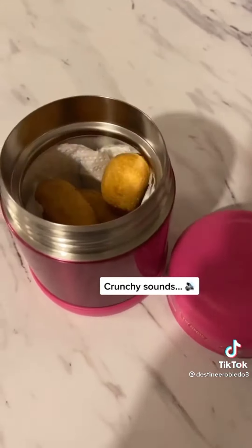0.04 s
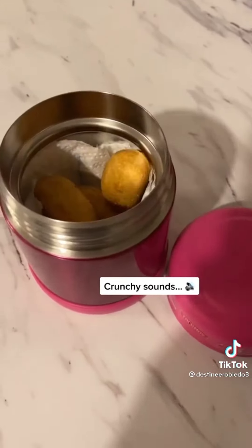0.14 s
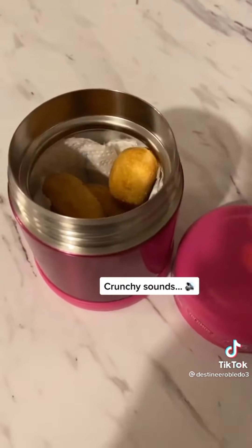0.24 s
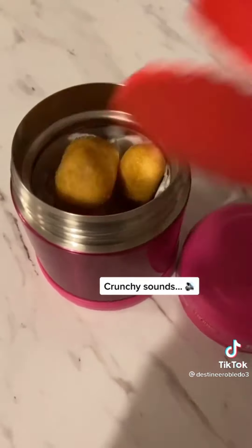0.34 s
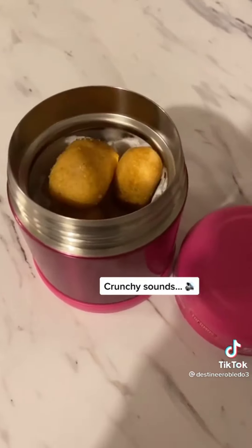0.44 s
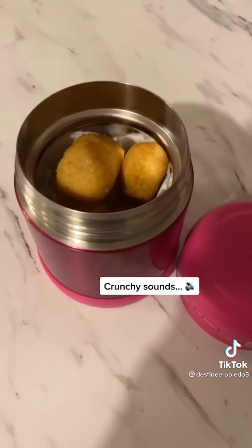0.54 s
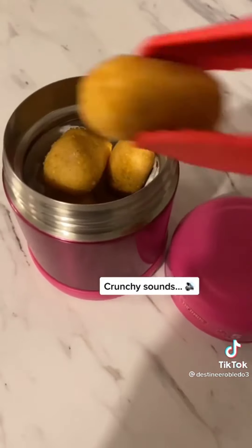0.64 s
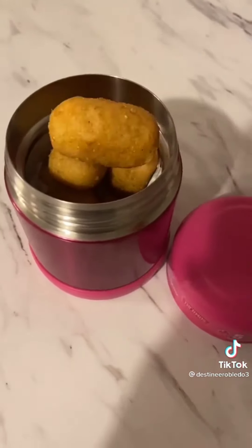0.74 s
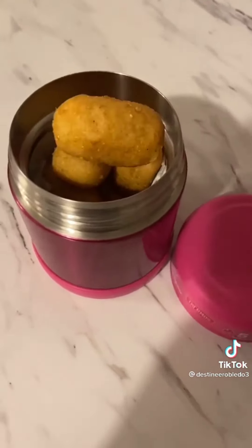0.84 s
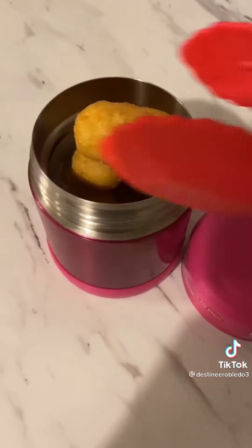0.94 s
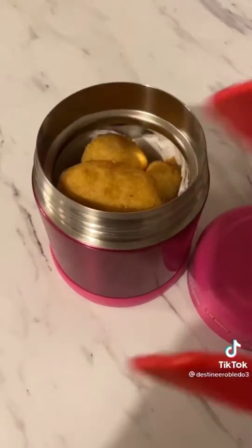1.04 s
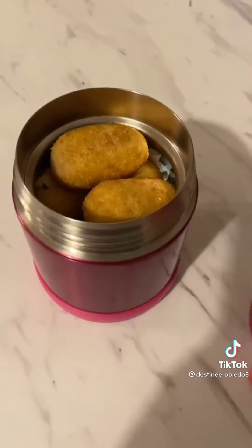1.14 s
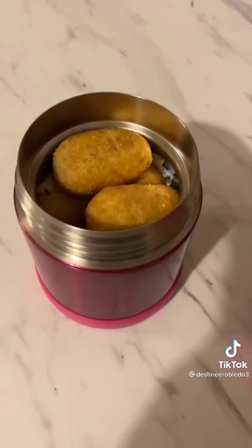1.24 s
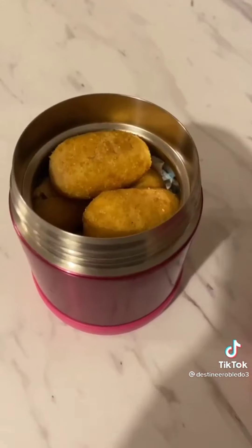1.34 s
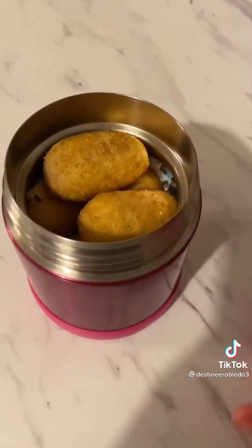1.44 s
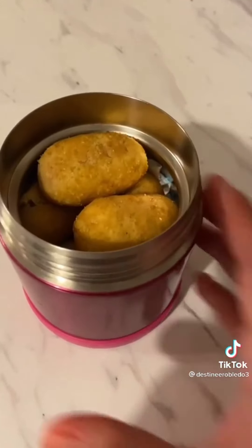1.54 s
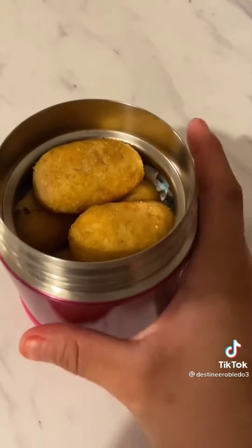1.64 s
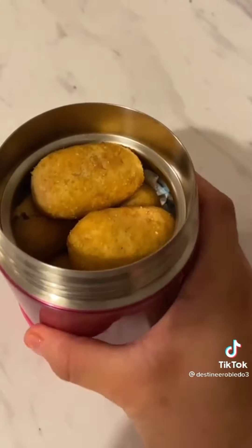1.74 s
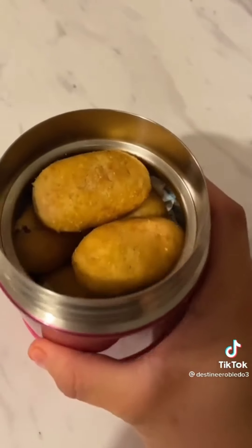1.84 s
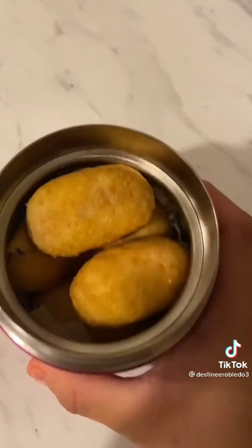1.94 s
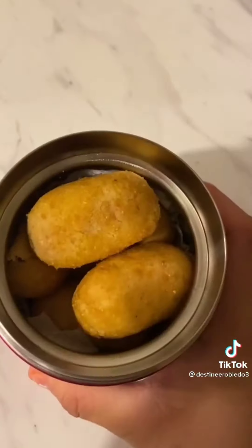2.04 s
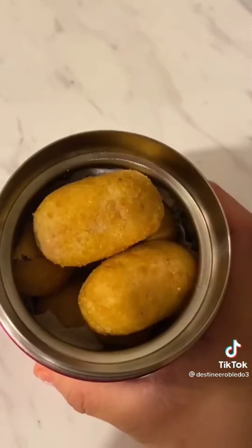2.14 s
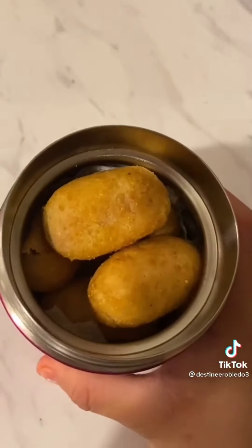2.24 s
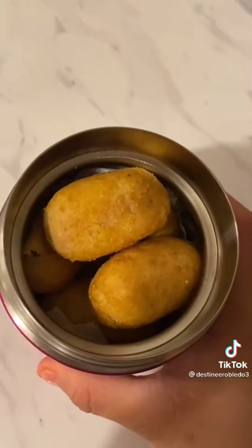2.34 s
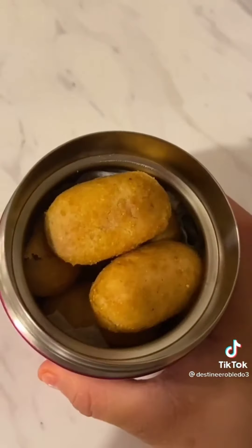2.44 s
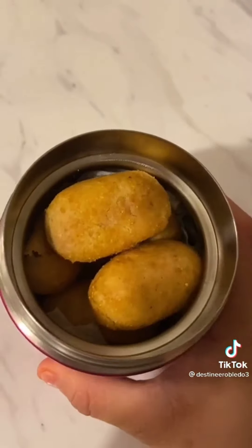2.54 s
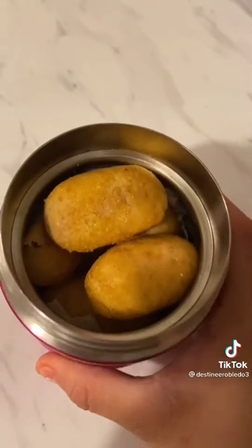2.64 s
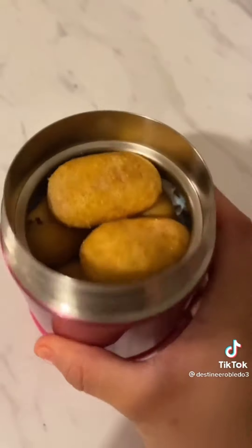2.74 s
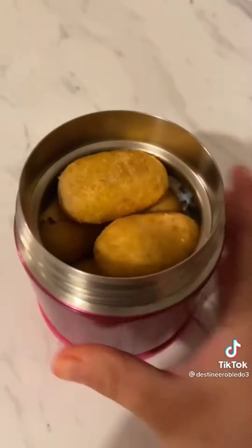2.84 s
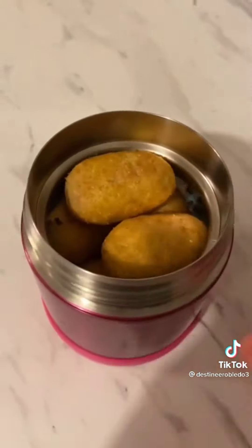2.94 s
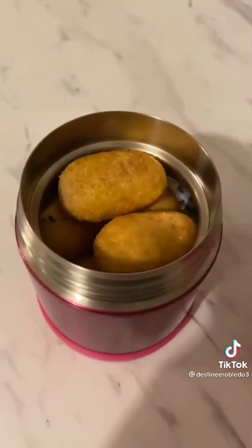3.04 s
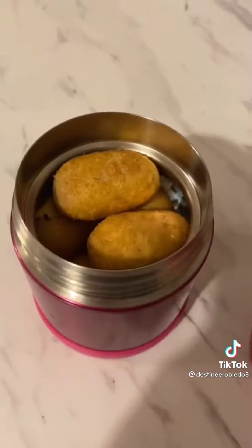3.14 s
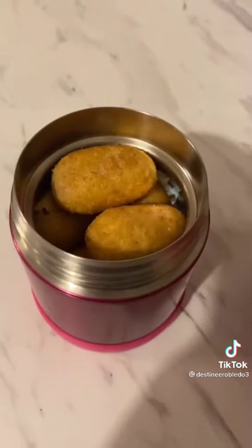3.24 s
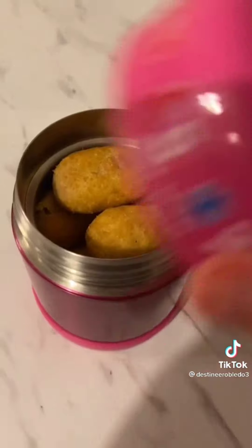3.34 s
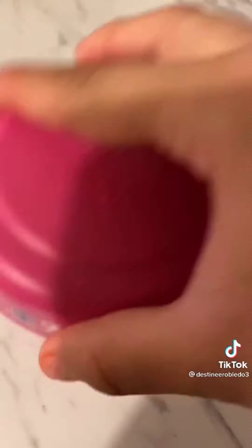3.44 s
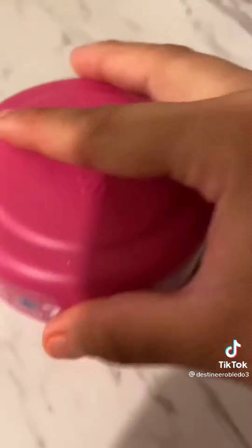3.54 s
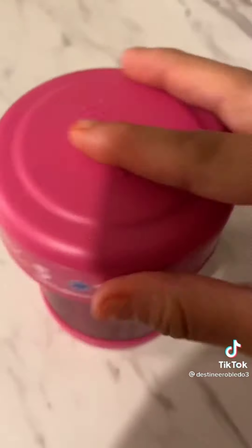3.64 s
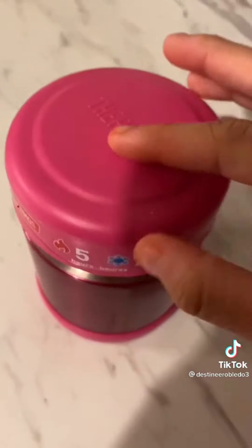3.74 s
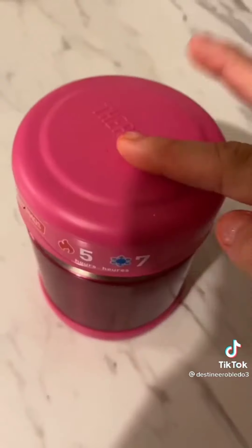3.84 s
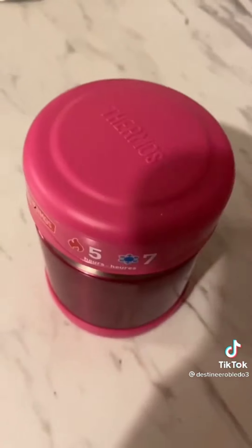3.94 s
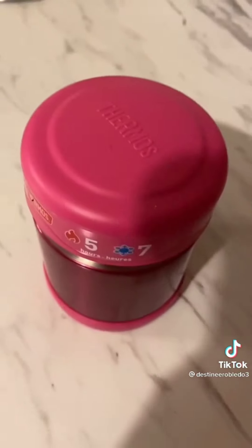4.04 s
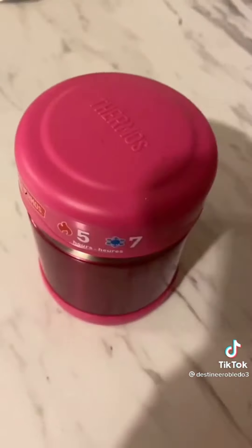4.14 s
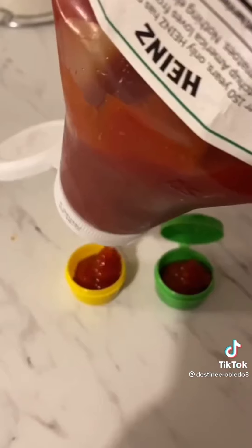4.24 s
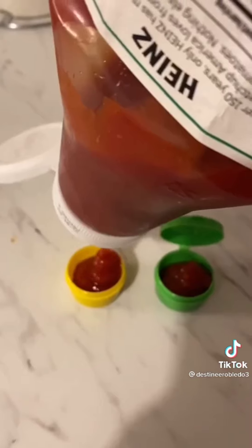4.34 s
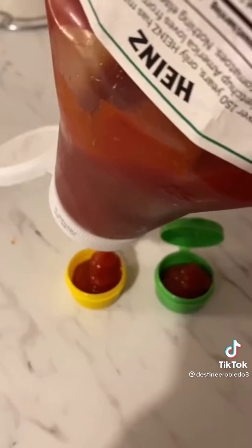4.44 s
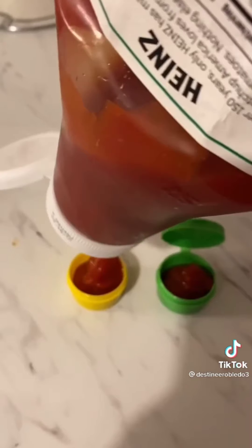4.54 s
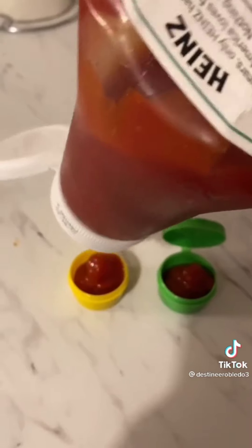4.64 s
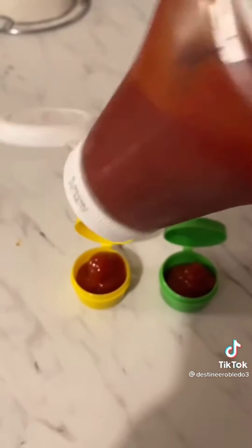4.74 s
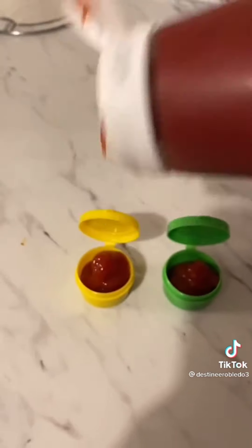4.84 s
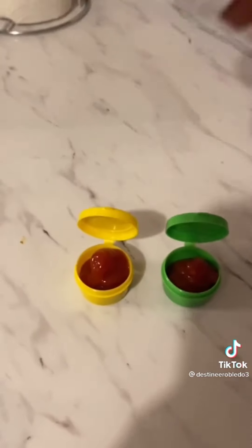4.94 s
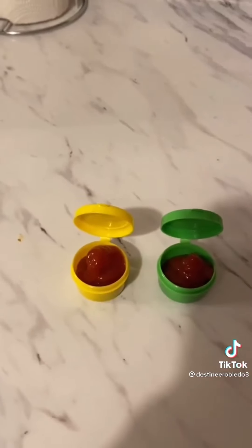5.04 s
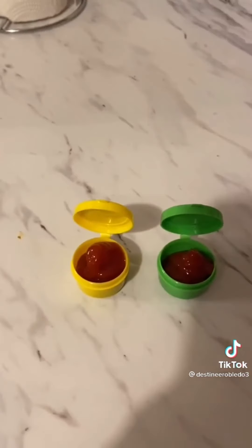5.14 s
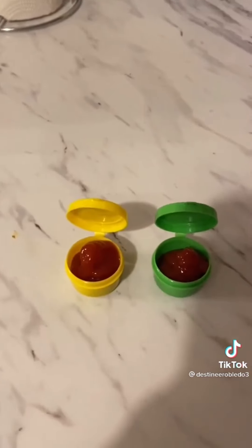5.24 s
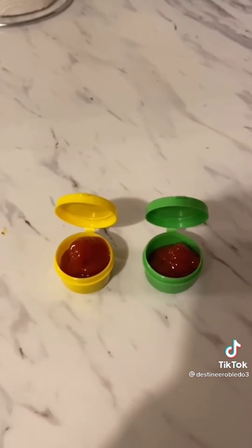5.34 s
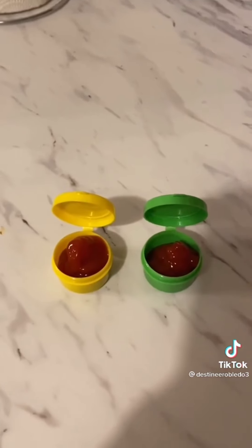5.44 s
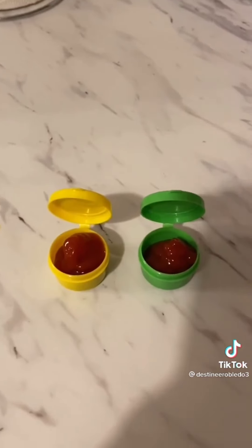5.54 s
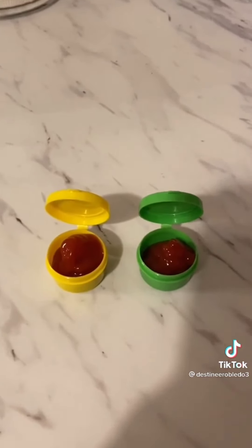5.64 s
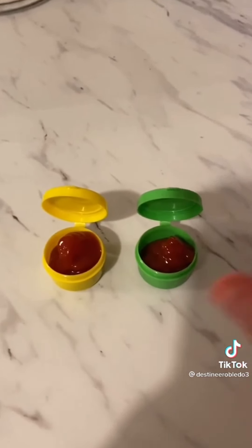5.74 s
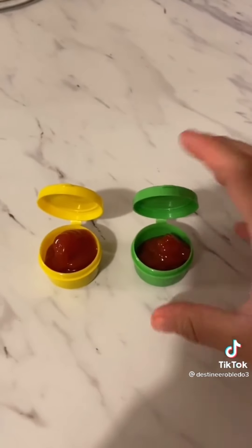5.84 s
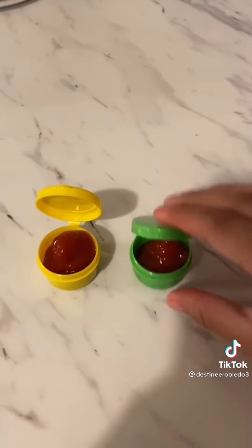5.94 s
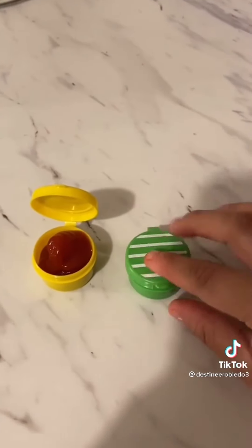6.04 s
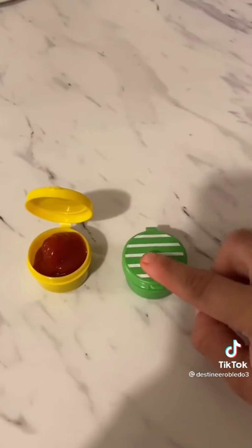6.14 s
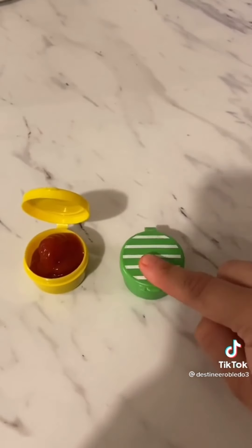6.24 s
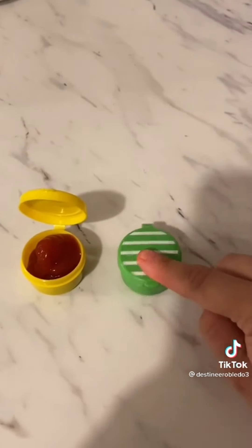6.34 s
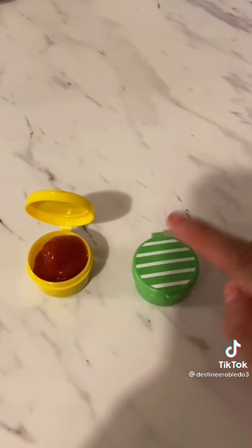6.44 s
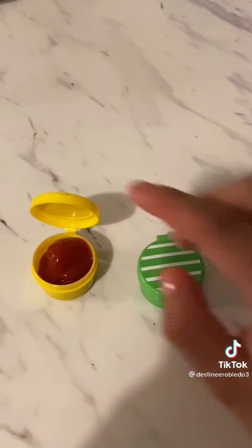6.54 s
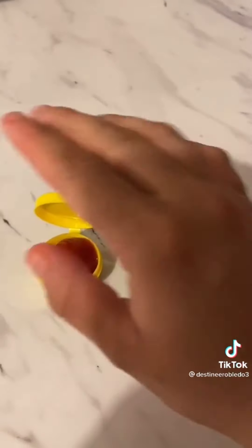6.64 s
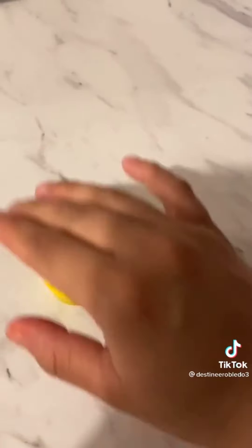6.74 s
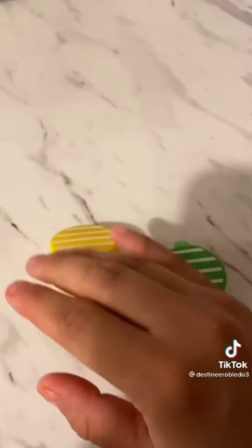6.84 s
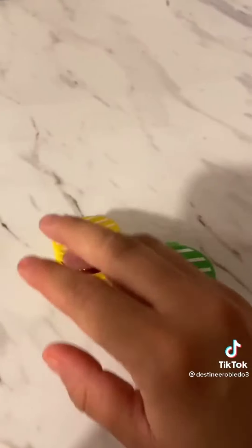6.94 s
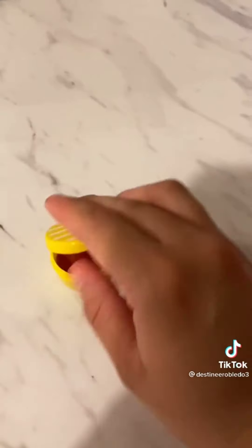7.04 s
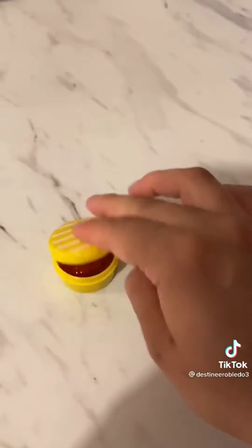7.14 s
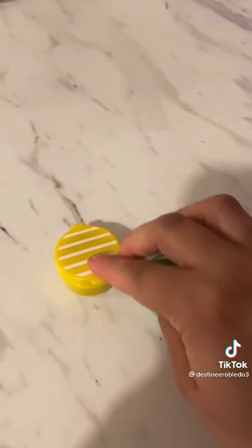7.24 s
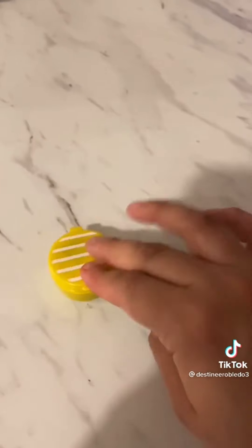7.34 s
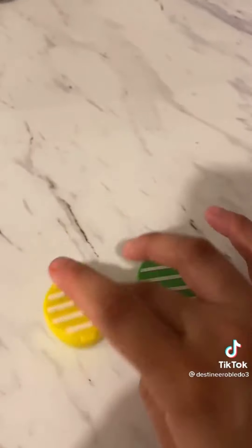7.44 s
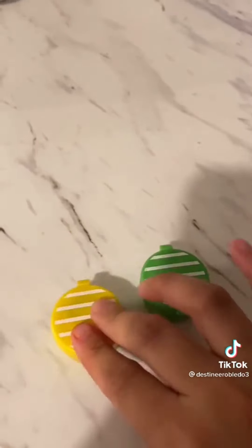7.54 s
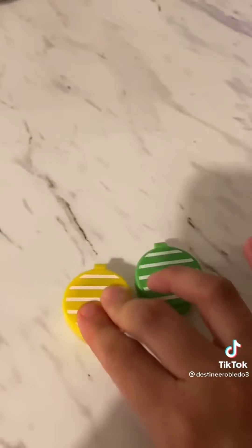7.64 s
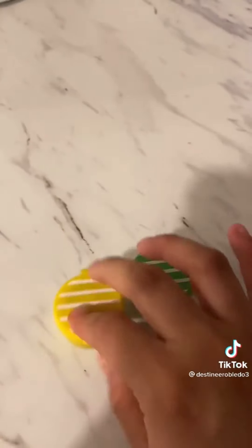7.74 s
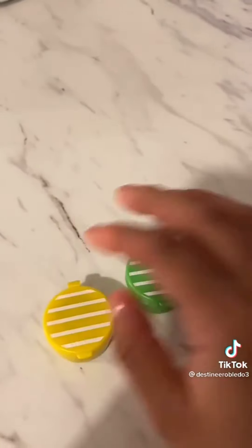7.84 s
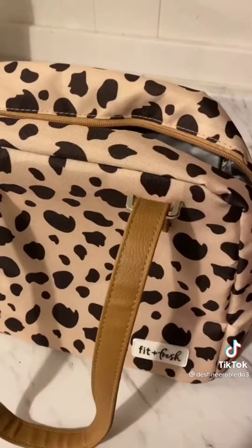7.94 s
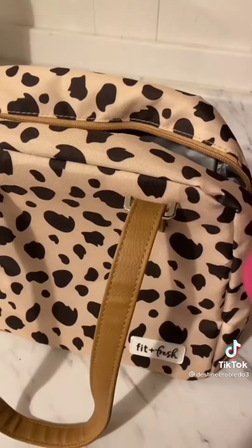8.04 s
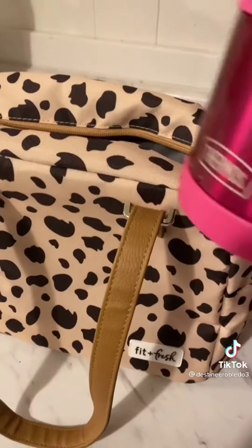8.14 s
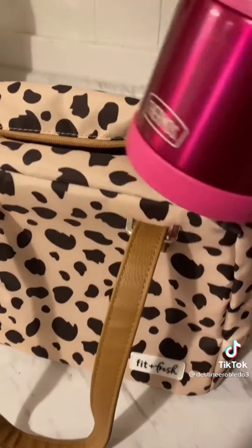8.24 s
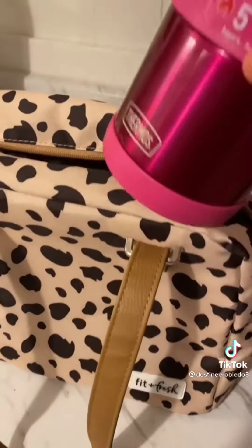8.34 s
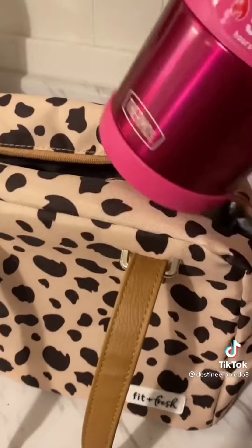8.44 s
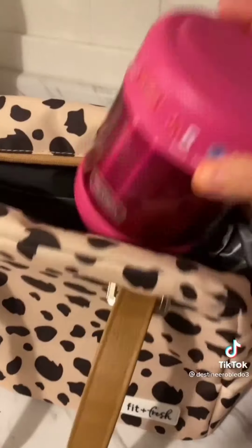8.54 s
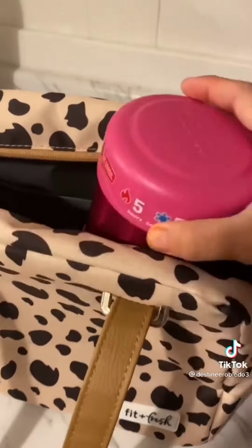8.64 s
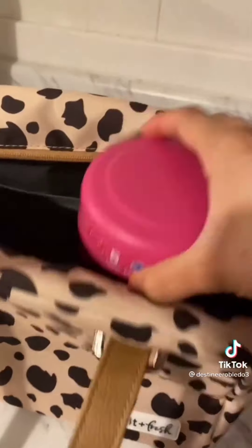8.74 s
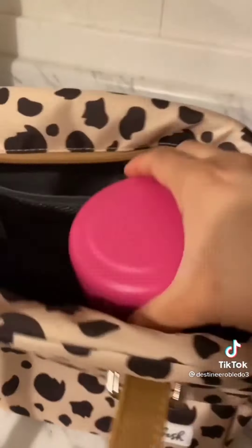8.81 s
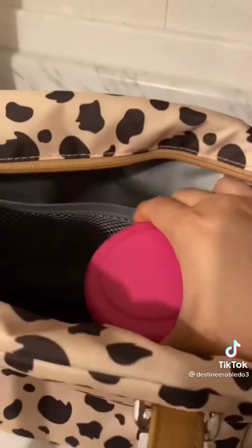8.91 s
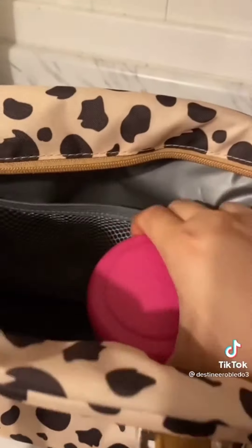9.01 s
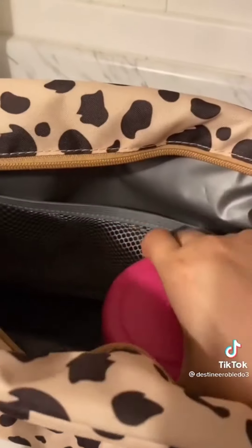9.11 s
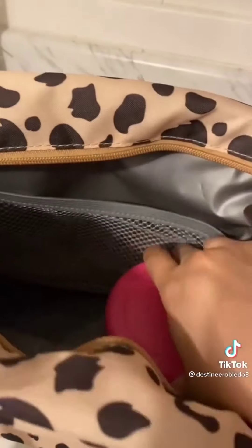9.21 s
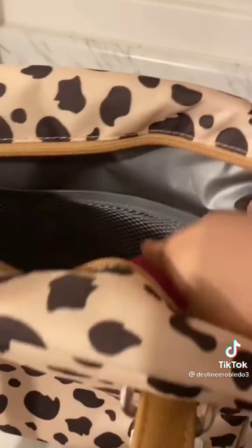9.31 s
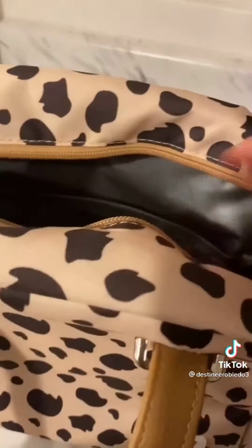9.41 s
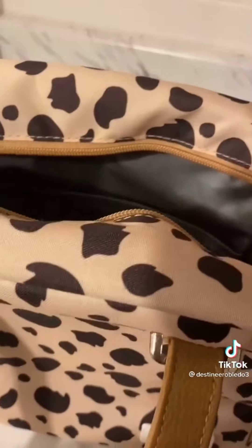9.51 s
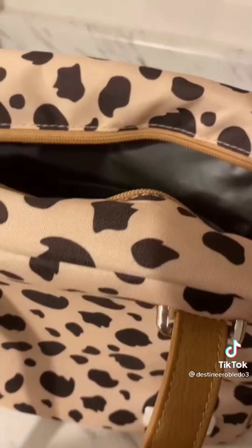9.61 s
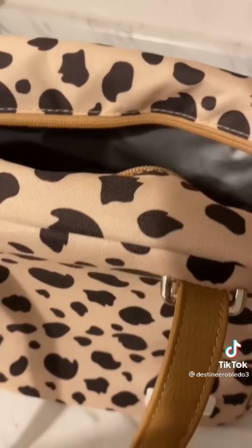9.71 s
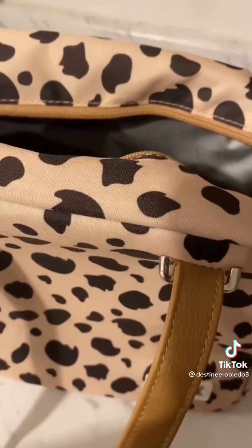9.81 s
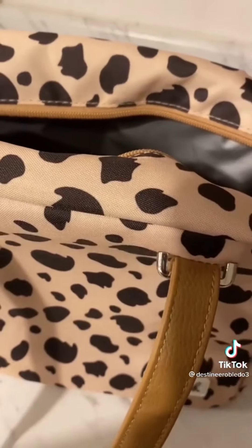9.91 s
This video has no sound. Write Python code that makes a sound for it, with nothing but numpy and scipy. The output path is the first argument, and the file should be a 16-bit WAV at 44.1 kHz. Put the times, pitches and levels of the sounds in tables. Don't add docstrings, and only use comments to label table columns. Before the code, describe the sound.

Crisp snacks patter faintly into a metal food flask, its lid knocks on and grinds shut, plastic pots snap, then a fabric bag rustles over kitchen hum.

```python
import sys
import numpy as np
from scipy import signal
from scipy.fft import rfft, irfft, next_fast_len
from scipy.io import wavfile
from scipy.ndimage import uniform_filter1d

SR = 44100
rng = np.random.default_rng(int(sys.argv[2]) if len(sys.argv) > 2 else 0)


def generate_wav(signal):
    frames = np.transpose(np.atleast_2d(signal))
    scaled = np.clip(frames, -1, 1) * 32767
    pcm = np.round(scaled).astype(np.int16)
    wavfile.write(sys.argv[1], SR, pcm)


def elevation(decibels):
    levels = np.asarray(decibels, float)
    return 10 ** (levels / 20)


N = 439677
LONG = next_fast_len(N)
HZ = np.fft.rfftfreq(LONG, 1 / SR)
MOVE_S = 7.905


def evened(x):
    return x / np.sqrt(np.mean(abs(x) ** 2) + 1e-30)


def read(points, hz):
    f, value = np.transpose(points)
    return np.interp(np.log(hz + 1), np.log(f + 1), value)


def along(rows):
    s, level_db = np.transpose(rows)
    return np.interp(np.arange(N) / SR, s, level_db)


def rings(modes, hz):
    total = 0
    for k, (f, width_hz, db) in enumerate(modes):
        total = total + (-1) ** k * elevation(db) / (1 + 2j * (hz - f) / width_hz)
    return total


def coloured(x, gain):
    return irfft(rfft(x, LONG) * gain, LONG)[..., :N]


def field(shape, level_db):
    colour = evened(elevation(read(shape, np.fft.rfftfreq(1024, 1 / SR))))
    return colour[:, None] * elevation(level_db[::256])


def hiss(strength, patchy_db):
    a, b, c, d, patches = rng.standard_normal((strength.shape[1], 513, 5)).T
    patches = uniform_filter1d(patches, size=14, axis=0)
    patches = evened(uniform_filter1d(patches, size=12, axis=1))
    z = np.array([a + 1j * b, c + 1j * d]) * elevation(patchy_db * patches - 26) * strength
    sound = signal.istft(z, nperseg=1024, noverlap=768)[1]
    return np.pad(sound, [(0, 0), (0, 256)])[:, :N]


# [s, dB]
KITCHEN = [(0.0, -61.5), (1.07, -60.5), (1.08, -67), (2.6, -67.5), (3.11, -62.5), (3.66, -58.5),
           (3.99, -59), (4.12, -64.5), (6.19, -65), (6.45, -59.5), (6.74, -58.5), (7.08, -60.5),
           (7.38, -57), (7.9, -61), (7.91, -72), (9.97, -73)]
# [Hz, dB per Hz]
AIR = [(15, -57), (25, -18.5), (44, -5), (130, -8), (170, -4), (270, -13), (416, -10.5), (677, -25.5),
       (1370, -26), (2910, -63.5), (8500, -49), (16000, -77)]
# [Hz, dB per Hz]
CORNER = [(15, -45), (25, 4), (64, -35), (102, -4.5), (714, -19), (2000, -37), (3620, -38.5),
          (16000, -41.5)]
# [s, dB]
HANDS = [(0.0, -77), (0.85, -74.5), (1.02, -70.5), (1.08, -84), (2.55, -84), (3.01, -82), (3.37, -69.5),
         (3.44, -61), (3.61, -60.5), (3.78, -72.5), (4.46, -84.5), (5.01, -76), (5.47, -81.5), (7.3, -74.5),
         (7.45, -62), (7.58, -74), (7.9, -77)]
# [Hz, dB per Hz]
SKIN = [(880, -39), (1500, -10), (3810, -14.5), (7320, -15), (10100, -18.5), (16000, -18)]


def air():
    air_db, hands_db = along(KITCHEN), along(HANDS)
    counter = np.arange(0, N, 256) / SR < MOVE_S
    room = np.where(counter, field(AIR, air_db + 0.68), field(CORNER, air_db - 3.0))
    brushing = counter * field(SKIN, hands_db + 0.24)
    return hiss(np.hypot(room, brushing), patchy_db=2.5)


# [Hz, Hz, dB]
FRIDGE = [(174.6, 14, -3), (186.3, 8, -6), (226, 11, -8.5), (287, 9.7, -11.5), (352.2, 24, -10.5),
          (590, 10, -13.5), (980, 0.61, -20), (1450, 67, -22.5), (1697, 14, -22)]
# [Hz, dB over the air]
COMPRESSOR = [(410.5, -3.5), (468.8, -12), (1061, -22)]
HUM_HZ = 59.2
HUM_DB, WALL_HUM_DB = -7, 8.5


def motors():
    air_db, t = along(KITCHEN), np.arange(N) / SR
    wall = t > MOVE_S
    lines = evened(coloured(rng.standard_normal((2, N)), abs(rings(FRIDGE, HZ)) ** 1.163))
    tones = sum(elevation(db) * np.sin(2 * np.pi * hz * t) for hz, db in COMPRESSOR)
    waver = evened(coloured(rng.standard_normal(N), rings([(HUM_HZ, 14, 0)], HZ) ** 2))
    hum = np.sqrt(2) * np.sin(2 * np.pi * HUM_HZ * t) + np.where(wall, .5, 2.2) * waver
    hum_db = air_db + HUM_DB + WALL_HUM_DB * wall
    return elevation(air_db - 9.8 * wall) * (elevation(-1.0) * lines + tones) + elevation(hum_db - 1) * hum


# [s, s, Hz, dB]
WHINES = [(0, 1.07, 10000, -95), (0, .3, 9900, -97), (.55, .8, 9900, -98), (.1, .9, 10400, -99),
          (1.07, 2.75, 10040, -101), (1.07, 1.4, 9938, -100), (1.7, 2.65, 9938, -105),
          (1.6, 2.5, 10140, -106), (1.1, 2.5, 9838, -107), (2.9, 6.3, 10070, -101), (6.3, 7.9, 10200, -94),
          (1.47, 1.58, 2820, -92), (2.92, 3.1, 3330, -94), (3.82, 4.11, 3340, -93), (4.1, 4.19, 3760, -96),
          (4.2, 4.31, 3340, -95), (5.58, 5.8, 3790, -97), (6.3, 6.42, 3750, -93), (6.5, 6.62, 3750, -93),
          (6.42, 6.66, 5250, -96), (7.56, 7.9, 3400, -90), (7.73, 7.9, 3800, -89), (7.9, 8.4, 3548, -103),
          (9.36, 9.62, 2837, -105), (9.6, 9.97, 2837, -111), (9.5, 9.97, 3548, -106)]


def whines():
    out = np.zeros(N)
    for (start, end, hz, db), drift in zip(WHINES, rng.standard_normal((len(WHINES), 2, 400))):
        part = out[round(start * SR):round(end * SR)]
        t = np.arange(len(part)) / SR
        a, b = (np.interp(t * 90, np.arange(len(d)), d) for d in drift)
        tone = (2 + a) * np.sin(2 * np.pi * hz * t) + b * np.cos(2 * np.pi * hz * t)
        part += elevation(db) * tone * signal.windows.tukey(len(part), .05 / (end - start))
    return out


def gestures(rows, rise_db_s):
    t = np.arange(N) / SR
    moves = []
    for s, held, db in rows:
        before, after = rise_db_s * (s - t), 216 * (t - s - held)
        moves.append(db - np.maximum(np.maximum(before, after), 0))
    return np.max(moves, axis=0)


# [s, s, dB]
STROKES = [
    (8.31, 0.065, -75),
    (8.47, .08, -65.5),
    (8.65, 0.085, -63),
    (8.8, 0.026, -61),
    (8.94, 0.23, -70.5),
    (9.025, 0.028, -63.5),
    (9.165, 0.013, -66.5),
    (9.24, 0.046, -65),
]
# [s, s, dB]
FOLDS = [
    (8.48, 0.1, -68),
    (8.72, 0.093, -63),
    (9.0, 0.2, -63.5),
    (9.27, 0.056, -69),
]
# [Hz, dB per Hz]
SCRAPE = [(880, -28.5), (1500, -10.5), (5660, -5.5), (7540, -13), (8570, -8.5), (11100, -7), (16000, -12)]
# [Hz, dB per Hz]
CLOTH = [(76, -33.5), (130, -2), (238, 2), (397, 4.5), (707, -5), (1660, -6), (3000, -12.5), (4200, -58.5)]


def bag():
    scrape = field(SCRAPE, gestures(STROKES, rise_db_s=350))
    cloth = field(CLOTH, gestures(FOLDS, rise_db_s=160))
    grains = evened(uniform_filter1d(rng.exponential(1, N) ** 3, size=130))
    catch = evened(elevation(1.7 * grains))
    first = round(MOVE_S * SR / 256)
    rub = hiss(np.hypot(scrape, cloth)[:, first:], patchy_db=2)
    return catch * np.pad(rub, [(0, 0), (first * 256, 0)])[:, :N]


def hard(crack, modes, modes_db):
    return lambda hz: evened(evened(elevation(read(crack, hz))) + elevation(modes_db) * evened(rings(modes, hz)))


def contacts(rows, edge, split_hz, hollow_q, fall_share, halo_db, halo_ms,
             core=0, edge_db=0, edge_share=0, widest_hz=700):
    size, out = 8192, np.zeros((2, N + 16384))
    ms, hz = (np.arange(size) - size // 2) * 1000 / SR, np.fft.rfftfreq(size, 1 / SR)
    high = 1 / (1 + (split_hz / (hz + 1)) ** 8)
    edges = edge(hz) * (1 - high), edge(hz) * high
    halo = elevation(halo_db) * np.cos(np.pi / 2 * np.clip(ms / halo_ms, -1, 1)) ** 2
    for (s, db, hollow_hz, spread, *crisp), noise in zip(rows, rng.standard_normal((len(rows), 2, size))):
        puff = np.exp(np.where(ms < 0, ms, -ms / fall_share) / spread)
        click = core * np.sqrt(spread * SR / 1000) * (ms == 0)
        rattle = rfft(noise * (puff + halo) + click)
        width_hz = min(hollow_hz / hollow_q, widest_hz)
        hollow = rings([(hollow_hz, width_hz, 0)], hz) ** 2 * hz / (hz + hollow_hz)
        over_db = [0] + [edge_db + edge_share * c for c in crisp] + crisp
        for part_db, body in zip(over_db, [hollow, *edges]):
            part = irfft(rattle * body)
            out[:, round(s * SR):][:, :size] += elevation(db + part_db - 0.5) * part / abs(part[0]).max()
    return out[:, size // 2:][:, :N]


# [s, peak dB, Hz, ms]
BUMPS = [(0.097, -42.5, 176, 11), (2.712, -24.5, 163, 8.5), (3.419, -29.5, 129, 14),
         (3.69, -21.5, 165.3, 15.5), (3.685, -35, 69.96, 20), (4.449, -32, 110, 5.1), (5.237, -36, 190, 4),
         (5.262, -34, 147, 12.5), (5.297, -28, 120, 6.5), (5.397, -32.5, 111.6, 9), (5.438, -48, 146, 8.5),
         (6.191, -39, 158.7, 6.3), (7.03, -45.5, 112, 35), (7.491, -35.5, 151, 13), (8.885, -56, 140, 9.2)]


def bumps():
    return contacts(BUMPS, np.ones_like, split_hz=4200, hollow_q=1.4, fall_share=2.7,
                    halo_db=-14.5, halo_ms=110, core=1.8)


# [s, peak dB, Hz, ms, dB over hollow]
TOUCHES = [(1.9, -72, 2000, 40, 0), (4.289, -56, 880, 5, -47), (4.443, -73.5, 714, 18.5, 22),
           (4.822, -54.5, 2365, 14.6, -5), (4.825, -48, 520, 3.5, -34), (4.91, -65, 950, 8.9, -6),
           (5.3, -51.5, 800, 29, -17), (5.39, -54, 2600, 3.7, -17), (5.44, -55.5, 760, 16, -24),
           (5.24, -59.5, 3350, 15.8, 10), (5.908, -47.5, 840, 16.8, -13), (5.94, -55.5, 2100, 10, -16),
           (5.99, -58.5, 1320, 23, -26), (6.07, -49.5, 980, 20, -20.5), (6.335, -59, 840, 74, -17.5),
           (6.714, -56, 4190, 8, -3), (6.87, -56.5, 990, 45, -18), (7.285, -60, 4500, 8.4, 2.5),
           (7.37, -46, 1300, 44, -16), (7.43, -56, 5300, 12, -10), (7.56, -53, 910, 21, -9),
           (7.72, -51.5, 900, 32, -35)]
# [Hz, Hz, dB]
TIP_MODES = [(2510, 1400, 0.5), (4500, 1100, 5.4), (11030, 5500, 5.6), (15640, 1900, 6.1)]


def touches():
    return contacts(TOUCHES, hard(SKIN, TIP_MODES, 3.2), split_hz=5800, hollow_q=0.5, fall_share=0.76,
                    halo_db=-17.0, halo_ms=44.3, edge_db=1, edge_share=0.37)


# [s, peak dB, Hz, ms, dB over hollow]
ZIP_TAPS = [
    (8.921, -58.5, 2000, 8.2, -14),
    (8.986, -58, 1000, 6, -14),
    (9.035, -60, 1800, 10, -7),
    (9.18, -61, 1220, 7, -7),
    (9.35, -59.5, 2300, 5, -18),
]


def zip_taps():
    return contacts(ZIP_TAPS, hard(SKIN, TIP_MODES, 3.2), split_hz=5800, hollow_q=0.9, fall_share=1.09,
                    halo_db=-17, halo_ms=40, edge_db=1.5, edge_share=0.4, widest_hz=1500)


# [s, peak dB, Hz, ms, dB over hollow]
SNACKS = [(0.073, -65, 2230, 8.8, 12.5), (0.094, -58.5, 800, 10, 6.5), (0.264, -50.5, 615, 18, -34),
          (0.285, -51.5, 2300, 18, 8), (0.418, -78, 1720, 14, 23.5), (0.479, -73.5, 1450, 11, 13),
          (0.635, -60, 1540, 12, 4), (0.859, -76, 1250, 22, 22), (0.942, -57, 670, 8.6, 6.5),
          (0.979, -61, 660, 19, 13.5), (1.029, -70, 695, 20, -21), (1.359, -63, 710, 7.2, -25),
          (1.519, -89.5, 2920, 23, 33.5), (1.619, -83.5, 653, 48, 21), (1.954, -63, 1450, 9.8, -10)]
# [Hz, dB per Hz]
CRUST = [(590, -52), (1000, -3), (2410, -10.5), (7270, -6.5), (9060, -35), (16000, -19)]
# [Hz, Hz, dB]
CRUST_MODES = [(2350, 150, -1.5), (2900, 120, -42), (5300, 7200, -20), (9260, 5400, -9.5),
               (13760, 1700, -6.5)]


def snacks():
    return contacts(SNACKS, hard(CRUST, CRUST_MODES, 1.3), split_hz=6100, hollow_q=2.3, fall_share=1.0,
                    halo_db=-12.0, halo_ms=41, edge_db=1.5, edge_share=0.5)


# [s, peak dB, Hz, ms, dB over hollow]
POTS = [
    (5.238, -37, 420, 11, -22.5),
    (5.392, -38.5, 663, 2.6, -18),
    (6.179, -34.5, 449, 7.4, 0.5),
    (6.194, -32, 590, 3.3, 9.5),
    (6.217, -53, 634, 2.4, 7),
    (6.733, -42, 635, 3.4, 8),
    (6.749, -30.5, 392, 2.9, 4.5),
    (7.468, -33, 1704, 5.4, -8.5),
    (7.496, -28, 640, 7.3, -2.5),
    (7.516, -58, 500, 8, -6),
]
# [Hz, dB per Hz]
POT = [(530, -62), (900, 18), (7580, -2.5), (10900, -6), (15100, -12.5), (16000, -51.5)]
# [Hz, Hz, dB]
POT_MODES = [(1300, 80, 26.5), (1720, 37, 32), (2820, 20, 25), (3700, 52, 19), (4045, 52, 13.5),
             (4500, 150, 13.5), (6320, 130, 7.5), (9795, 84, 20), (10770, 120, -22.5)]


def pots():
    return contacts(POTS, hard(POT, POT_MODES, -7.5), split_hz=4240, hollow_q=1.08, fall_share=0.94,
                    halo_db=-17, halo_ms=58.6, core=0.21, edge_db=0.7, edge_share=0.39)


# [s, peak dB, Hz, ms, dB over hollow]
FLASK = [(2.702, -32.5, 704, 6.5, -20), (2.710, -24.5, 360, 5.1, -41), (2.74, -44, 400, 17, -23),
         (3.11, -39.5, 600, 17, -48), (3.412, -28.5, 520, 5.1, -10.5), (3.422, -21, 600, 1.5, -17.5),
         (3.428, -15, 546, 4, -13), (3.453, -24.5, 440, 16, -26), (3.495, -36.5, 420, 12.4, -35.5),
         (3.918, -70, 420, 7.4, -31), (4.098, -59, 410, 8.7, -15.5)]
# [Hz, dB per Hz]
STEEL = [(530, -36), (900, -3), (5410, -17.5), (7200, -18.5), (8760, -13), (16000, -18)]
# [Hz, Hz, dB]
LID_MODES = [(1234, 42, 6), (1510, 36, 4), (1540, 87, 6.5), (2117, 58, 2), (2500, 48, -11.5),
             (2877, 73, -9.5), (3382, 100, -17), (4350, 110, -7.5), (5360, 380, -10.5)]


def flask():
    return contacts(FLASK, hard(STEEL, LID_MODES, 2.2), split_hz=4060, hollow_q=1.4, fall_share=1.2,
                    halo_db=-17.5, halo_ms=46, edge_db=17, edge_share=1.127)


# [s, peak dB, Hz, ms, dB over hollow]
THREAD = [
    (3.53, -54.5, 500, 35, -13),
    (3.605, -33, 474, 14, -23),
    (3.64, -30, 465, 18, -20.5),
    (3.66, -21, 465, 7.1, -10),
    (3.678, -14, 443, 8.4, -12.5),
    (3.694, -16.5, 328, 5.5, -7.5),
    (3.72, -33, 330, 8.5, -12),
    (3.75, -42.5, 300, 54, -15.5),
]
# [Hz, Hz, dB]
STEEL_MODES = [(760, 54, 4.5), (1230, 30, -0.5), (2120, 110, -2), (2840, 60, 4.5), (3440, 51, -1),
               (3770, 110, -3), (4500, 100, -8.5), (5240, 72, 0.5), (6460, 150, -2.5)]


def thread():
    return contacts(THREAD, hard(STEEL, STEEL_MODES, 1.4), split_hz=4700, hollow_q=1.8, fall_share=0.96,
                    halo_db=-14.5, halo_ms=59, edge_db=1.84, edge_share=.8)


# [s, Hz, dB, ms, ms]
RINGS = [(2.712, 388, -33.5, 4, 11), (2.708, 705, -42, 4, 8), (2.704, 1600, -48, 5, 5),
         (3.429, 441, -24, 6, 5), (3.432, 571, -21, 7, 2), (3.43, 705, -25, 6, 3), (3.427, 1210, -36, 5, 5),
         (3.427, 1440, -35, 5, 5), (3.427, 2060, -36, 5, 4), (3.426, 1750, -34, 5, 4),
         (3.445, 280, -30, 8, 8), (3.49, 2810, -62.5, 10, 10), (3.492, 2060, -62, 6, 6),
         (3.605, 460, -41, 14, 12), (3.652, 460, -29, 17, 10), (3.65, 716, -39, 12, 10),
         (3.66, 2820, -40, 13, 26), (3.655, 2060, -48, 12, 12), (3.677, 450, -18, 3, 7.7),
         (3.679, 571, -21, 4, 5), (3.68, 3420, -38, 8, 8), (5.24, 3350, -60, 6, 5),
         (3.73, 2100, -55, 6, 10), (5.392, 680, -43, 5, 6), (5.391, 1310, -50, 3.6, 3.5),
         (5.391, 1960, -58, 3, 4), (6.185, 2900, -52.5, 5, 4), (6.172, 4800, -55, 7, 4),
         (6.718, 4250, -55, 7.3, 8), (6.748, 378, -43, 7, 7), (7.468, 1750, -46, 4, 4)]
RING_ROUGH = .4


def ringing():
    out, t = np.zeros((2, N)), np.arange(-3000, 3000) / SR
    for (s, hz, db, swell, fade), drift in zip(RINGS, rng.standard_normal((len(RINGS), 2, 40))):
        u = 1000 * t / np.where(t < 0, swell, fade)
        shape = np.exp(-u ** 2 / 2) + .12 * np.exp(-abs(u) / 2)
        chatter = np.interp(np.linspace(0, 39, len(t)), np.arange(40), drift[0] + 1j * drift[1])
        turn = elevation(db) * shape * (1 + RING_ROUGH * chatter) * np.exp(2j * np.pi * hz * t)
        out[:, round((s + t[0]) * SR):][:, :len(t)] += [turn.imag, turn.real]
    return out


def knocks():
    soft = bumps() + touches() + zip_taps()
    return soft + snacks() + pots() + flask() + thread() + ringing()


# [Hz, radians]
LEAD = [(0, 0), (1380, -0.2), (3100, 0.7), (5340, 0.2), (6290, 2.3), (9730, 5.8), (12500, 8.6),
        (16300, 13.4)]


def ports(pair, same, lean):
    a, b = rfft(pair, LONG)
    c, tilt = np.clip(read(same, HZ), 0, 1), elevation(read(lean, HZ) / 2)
    right = (c * a + np.sqrt(1 - c ** 2) * b) * np.exp(-1j * read(LEAD, HZ))
    return irfft(np.array([a * tilt, right / tilt]), LONG)[:, :N]


# [Hz, 0-1]
NEAR_SAME = [(60, 1), (300, .99), (700, .97), (2000, .87), (4000, .93), (15000, .91)]
# [Hz, 0-1]
FAR_SAME = [(60, 1), (240, 1), (950, 0.47), (3770, 0.77), (15000, 0.38)]
# [Hz, dB]
NEAR_LEAN = [(60, -2), (180, -0.5), (550, -6.5), (1650, -0.5), (4970, -1), (15000, 1.5)]
# [Hz, dB]
FAR_LEAN = [(60, 0.5), (240, -2.5), (950, 0.7), (6000, -0.5)]


def scene():
    far = motors() + whines() + air() + bag()
    return ports(far, FAR_SAME, FAR_LEAN) + ports(knocks(), NEAR_SAME, NEAR_LEAN)


def band_limit(x):
    return signal.sosfilt(signal.butter(12, 16680, fs=SR, output="sos"), x)


# low_hz, high_hz, wander_hz, closing_hz when loud [all Hz]
GAPS = [(6900, 8250, 130, 280), (12600, 14550, 200, 230), (15550, 24000, 100, 120)]


def record(dry):
    hz, t, z = signal.stft(dry, SR, window="cosine", nperseg=2048)
    treble_db = 10 * np.log10((abs(z[:, hz > 5000]) ** 2).sum((0, 1)) + 1e-14)
    loud = np.clip((treble_db + 75) / 25, 0, 1)
    wander = np.repeat(rng.standard_normal((len(t), len(GAPS), 2)), 2, axis=0)[:len(t)].T
    for (low_hz, high_hz, width, closing), down, up in zip(GAPS, *wander):
        low = low_hz + width * down + closing * loud
        high = high_hz + width * up - closing * loud
        z = z * np.where((hz[:, None] > low) & (hz[:, None] < high), elevation(-33.5), 1)
    z[:, hz > 14400] *= np.where(treble_db + 2 * wander[0, 2] < -78, elevation(-25), 1)
    mix = signal.istft(z, SR, window="cosine", nperseg=2048)[1][:, :N]
    return band_limit(mix)


dry = scene()
out = record(dry)
generate_wav(out)
```